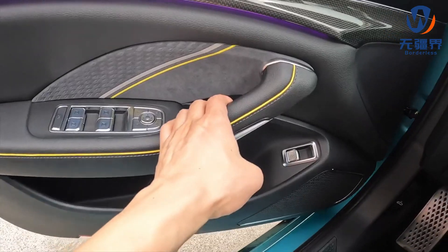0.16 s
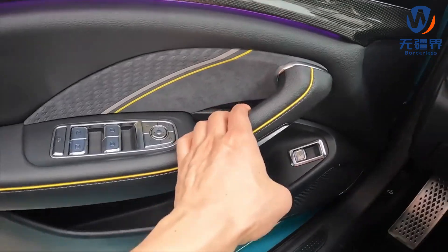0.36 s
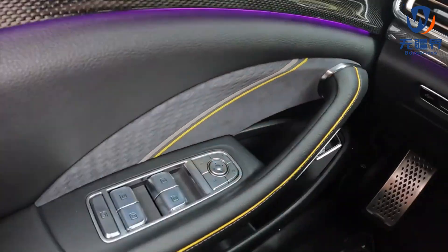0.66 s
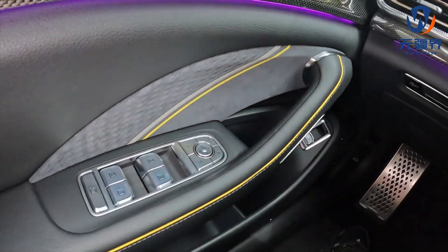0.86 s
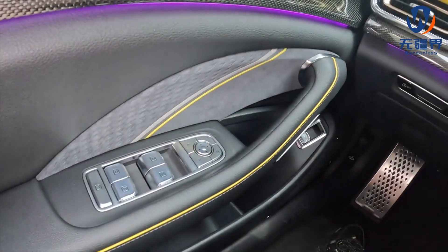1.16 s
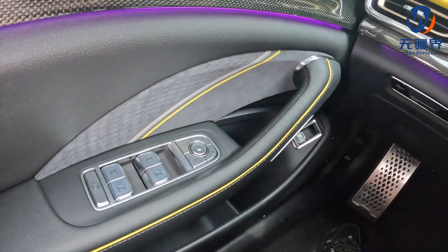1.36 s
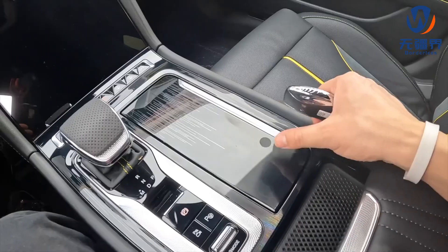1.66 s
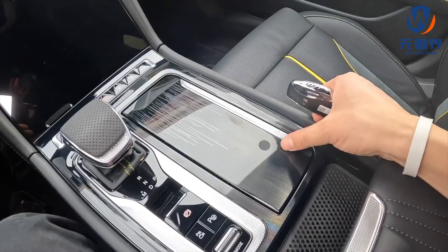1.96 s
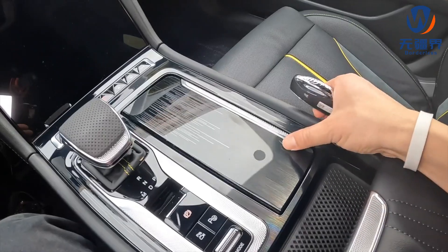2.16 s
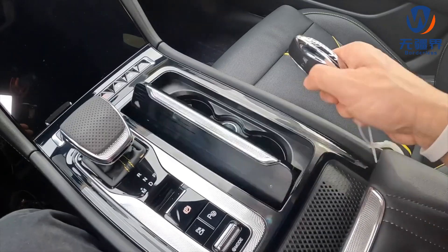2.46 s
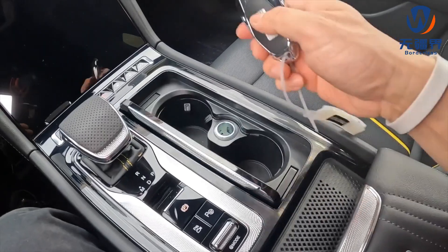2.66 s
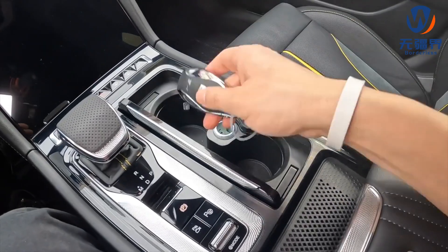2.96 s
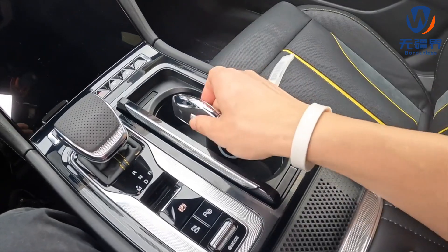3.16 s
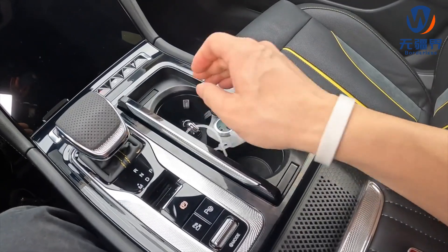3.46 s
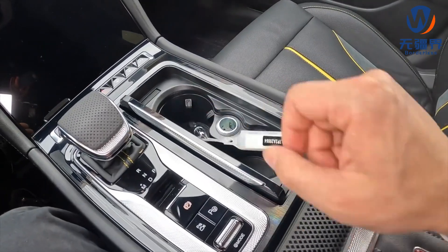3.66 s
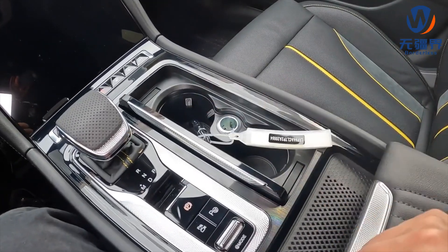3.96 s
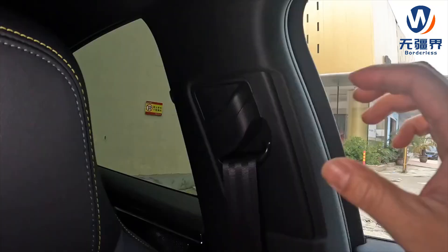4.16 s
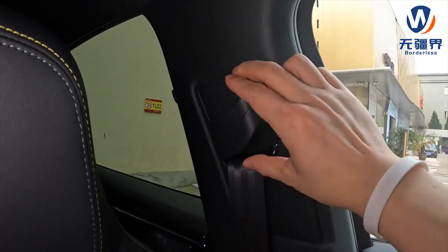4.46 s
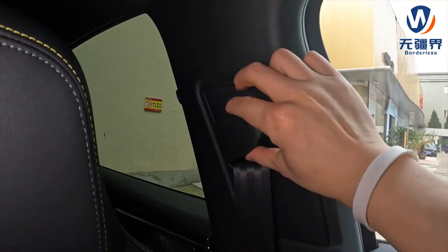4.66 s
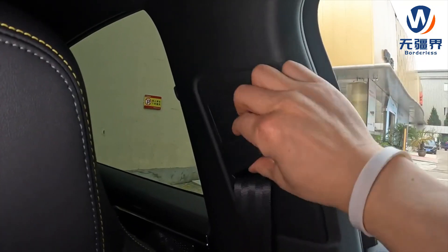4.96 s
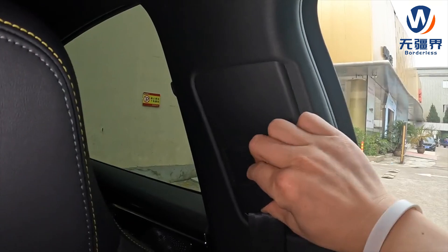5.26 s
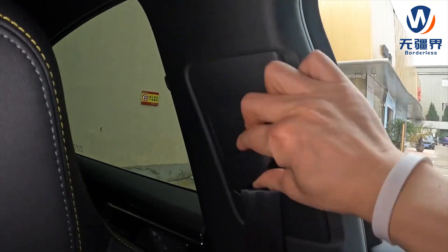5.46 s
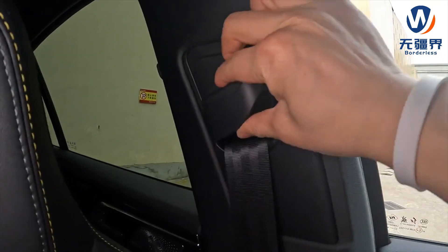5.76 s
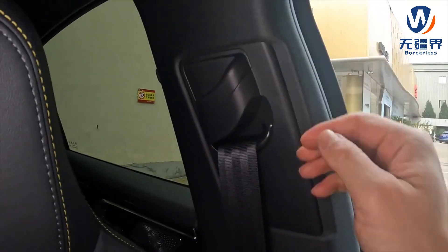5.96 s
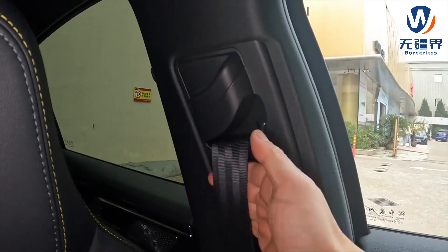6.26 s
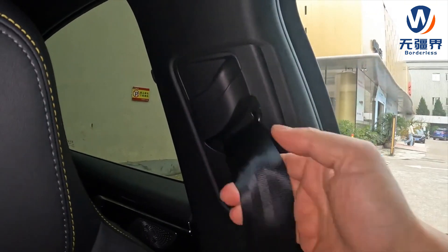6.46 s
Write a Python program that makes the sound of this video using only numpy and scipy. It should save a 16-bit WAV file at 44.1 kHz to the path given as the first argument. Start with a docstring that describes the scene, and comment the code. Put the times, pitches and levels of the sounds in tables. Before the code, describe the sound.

A parked car's dry, padded cabin, heard close from the seat with deep, uneven air rumble on the microphone. Faint street noise and light finger taps and rubbing open the scene. At about 0.65-0.7 s the door shuts: seal and latch thud, a hard punch and very deep boom, then quickly fading panel knocks until 0.9; the street is gone, leaving soft hiss, slightly louder from 1.5 to 4.1. A latch clicks at 2.0, the lid unhooks at 2.2 and stops softly at 2.6 over a low murmur. A fob tumbles hard in the cup holder at 3.3-3.4, rattles at 3.5, and its strap slaps at 3.7. After faint touches from 4.4, the belt adjuster scrapes down at 4.8, snaps at 5.0 and thuds at 5.1, slides up from 5.35 and clacks at 5.55. Taps, tiny squeaks near 5.95, then webbing hisses from 6.0, ending with a faint rising zip at 6.5.

```python
"""Street noise and deep rumble first, with light taps on trim, inside a parked car; then the door is pulled
shut and seals the street out. A console lid unlatches and flips open, a key fob drops in the cup holder, the
seat belt's height adjuster slides down and up into its stops, and the belt is drawn out.
Blows ring part modes and a short padded cabin; strokes are grainy noise; booms, webbing and squeaks are sines."""
import sys
import numpy as np
from scipy import signal
from scipy.fft import rfft, irfft, next_fast_len
from scipy.io import wavfile
from scipy.ndimage import uniform_filter1d

SR = 44100
rng = np.random.default_rng(int(sys.argv[2]) if len(sys.argv) > 2 else 0)


def master_out(mix):
    """Clip the mix to full scale and print it as 16-bit PCM to the path in sys.argv[1]."""
    frames = np.transpose(np.atleast_2d(mix))
    ceiling = np.clip(frames, -1, 1)
    pcm = np.round(ceiling * 32767).astype(np.int16)
    wavfile.write(sys.argv[1], SR, pcm)


N = 290619
TIME = np.arange(N) / SR  # s


def amp(db):
    """Decibels to gain."""
    return 10 ** (np.asarray(db) / 20)


def unit(x):
    """Scales to rms 1."""
    return x / np.sqrt(np.mean(x ** 2) + 1e-20)


def read(points, hz):
    """Reads a table along a log-frequency axis."""
    f, value = np.transpose(points)
    return np.interp(np.log(hz + 1), np.log(f + 1), value)


def swell(s, width_s, db):
    """A bell-shaped rise and fall of gain around time s."""
    return amp(db) * np.exp(-((TIME - s) / width_s) ** 2)


def add(mix, s, sound):
    """Mixes a sound in at time s."""
    part = mix[max(round(s * SR), 0):][:len(sound)]
    part += sound[:len(part)]


def noise(colour):
    """Steady noise of a given colour, rms 1."""
    size = next_fast_len(N, True)
    gain = amp(read(colour, np.fft.rfftfreq(size, 1 / SR)))
    spectrum = rfft(rng.standard_normal(size)) * gain
    return unit(irfft(spectrum, size)[:N])


def wobble(count, smooth):
    """Random drift of rms 1, smoothed over a number of samples."""
    return unit(uniform_filter1d(rng.standard_normal(count), size=smooth))


def tone(hz):
    """A sine that follows a varying pitch."""
    return np.sin(2 * np.pi * np.cumsum(hz) / SR)


def heave(depth_db, count=14):
    """A slow, uneven rise and fall of gain: sines from 0.8 to 6 Hz, the slower the stronger."""
    rates_hz, coarse = np.geomspace(.8, 6, count), TIME[::512]
    turns = np.outer(coarse, rates_hz) + rng.random(count)
    wave = np.sum(np.sin(2 * np.pi * turns) / np.sqrt(rates_hz), axis=1)
    return amp(depth_db * np.interp(TIME, coarse, unit(wave)))


# street colour: (frequency [Hz], relative density [dB per Hz])
STREET_COLOUR = [(53, -30.5), (90, -7), (114, -6), (222, -2.5), (483, -10), (1050, -9.5), (2950, -24),
                 (3430, -26.5), (9050, -32), (15500, -42.5)]
STREET_DB, SEALED_S, SEAL_DB_PER_S = -55.5, 0.852, 200


def street():
    """Steady street noise until the shut door seals it out."""
    return noise(STREET_COLOUR) * amp(STREET_DB - SEAL_DB_PER_S * np.maximum(TIME - SEALED_S, 0))


# hiss colour: (frequency [Hz], relative density [dB per Hz])
AIR_COLOUR = [(53, -29), (90, -7.5), (288, -17), (398, -14.5), (473, -18.5), (883, -20), (1330, -23),
              (3080, -26), (13900, -31), (15500, -28)]
AIR_DB, LOUDER_AIR_DB = -70.5, -62.5
LOUDER_FROM_S, LOUDER_TO_S = 1.545, 4.145


def air():
    """Faint steady hiss, at a higher level for a stretch."""
    louder = (TIME > LOUDER_FROM_S) & (TIME < LOUDER_TO_S)
    return noise(AIR_COLOUR) * amp(np.where(louder, LOUDER_AIR_DB, AIR_DB))


# rumble colour: (frequency [Hz], relative density [dB per Hz])
RUMBLE_COLOUR = [(4, 5), (8, 15.5), (17, 11), (24, -2.5), (31, -5.5), (40, -14.5), (55, -14), (72, -31),
                 (100, -36.5), (160, -46), (300, -72.5)]
# rumble surges: (time [s], 1/e half width [s], peak gain [dB])
SURGES = [(0.352, 0.22, -16.5), (5.55, 0.16, -19)]
RUMBLE_DB = -31  # before the heave


def rumble():
    """Deep rumble of air on the moving microphone, heaving slowly and surging as it is swung."""
    gain = amp(RUMBLE_DB) * heave(depth_db=1.8) + sum(swell(*row) for row in SURGES)
    return noise(RUMBLE_COLOUR) * gain


def causal(gain):
    """Minimum-phase response: a body rings only after it is struck."""
    log_gain = np.log(np.maximum(np.r_[gain, gain[-2:0:-1]], 1e-6))
    return np.exp(np.conj(signal.hilbert(log_gain)))[:len(gain)]


def ring(modes, hz, strengths):
    """Gain of a part: each mode lifts a narrow peak."""
    gain = 1
    for strength, (f, width_hz, lift_db) in zip(strengths, modes):
        gain = gain + strength * (amp(lift_db) - 1) / np.hypot(1, 2 * (hz - f) / width_hz) ** 1.64
    return gain


# cabin reverberation: (frequency [Hz], t60 [s])
CABIN = [(80, 0.27), (250, .11), (700, 0.088), (2500, 0.072), (6000, .07), (15000, 0.07)]


def cabin(size):
    """Dense reflections off glass and upholstery; the treble dies first."""
    hz, t, z = signal.stft(rng.standard_normal(size), SR, nperseg=256)
    fade = amp(-60 * t / read(CABIN, hz)[:, None])
    tail = signal.istft(z * fade, SR, nperseg=256)[1][:size]
    return unit(tail * (1 - np.exp(-np.arange(size) / SR / 0.0089)))


# colour of a contact on plastic: (frequency [Hz], gain [dB])
CONTACT = [(30, -11.5), (70, -6.5), (130, -1.5), (700, 3.5), (1500, -3), (3000, -9.5), (6000, -16),
           (7500, -19.5), (11000, -24.5), (16000, -31)]


def blows(rows, modes, t60_s, snap_db, rise_s, cabin_db, level_db, size=12288):
    """Each blow is a sharp contact and a brief rattle, rung through the part's modes and the cabin."""
    t, hz, out = np.arange(size) / SR, np.fft.rfftfreq(size, 1 / SR), np.zeros(N)
    edges_hz = [(110, 400), (400, 2500), (2500, 15000)]  # thud, knock, click
    bands = [(hz > lo) & (hz <= hi) for lo, hi in edges_hz]
    for s, *levels_db in rows:
        # each blow lands on another spot and favours other modes
        body = amp(read(CONTACT, hz)) * ring(modes, hz, rng.uniform(.6, 1.3, len(modes)))
        decay = np.exp(-np.log(1000) * t / t60_s)
        rattle = unit(rng.standard_normal(size) * decay * (1 - np.exp(-t / rise_s)))
        snap = amp(snap_db) * unit(1. * (t == 0))
        force = rfft(snap + rattle + amp(cabin_db) * cabin(size))
        # the hardness of the blow sets each band's rms over 10 ms
        energy = [2 * np.sum(abs(force * body)[band] ** 2) / size for band in bands]
        rms = np.sqrt(np.array(energy) / (SR / 100))
        thud, knock, click = np.array(levels_db) - 20 * np.log10(rms)
        hardness = amp(read([(300, thud), (480, knock), (2100, knock), (3100, click)], hz))
        add(out, s, irfft(force * causal(body * hardness)))
    return amp(level_db) * out


THUD_PER_BRIGHTNESS = 0.71  # dB of thud lost per dB of click over knock


def touches(rows, thud_db):
    """Light touches as blows: a nail or hard edge clicks, a fingertip thuds."""
    return [(s, db + thud_db - THUD_PER_BRIGHTNESS * bright, db, db + bright) for s, db, bright in rows]


def boom(s, hz, db, t60_s, rise_s, lag_turns):
    """A shove sets a low mode swinging as a decaying sine; any lag makes its pitch start lower."""
    t = np.arange(SR) / SR
    turns = hz * t - lag_turns * (1 - np.exp(-t / 0.048))
    envelope = np.exp(-np.log(1000) * t / t60_s) * (1 - np.exp(-t / rise_s))
    out = np.zeros(N)
    add(out, s, amp(db) * np.sin(2 * np.pi * turns) * envelope)
    return out


def wander(x, patchy_db):
    """As the contact moves, ever different narrow bands stand out."""
    z = signal.stft(x, nperseg=1024)[2]
    patches = uniform_filter1d(rng.standard_normal(z.shape), size=3, axis=0)
    patches = unit(uniform_filter1d(patches, size=7, axis=1))
    return signal.istft(z * amp(patchy_db * patches), nperseg=1024)[1][:N]


def band_part(x, band_hz):
    """One frequency band of a sound, scaled to rms 1."""
    return unit(signal.sosfilt(signal.butter(3, band_hz, "bandpass", fs=SR, output="sos"), x))


def slide(strokes, colour, grain_db, attack_s, release_s):
    """Friction: tiny slips make a grainy hiss that grows as a stroke gathers speed, holds, then dies."""
    out = np.zeros(N)
    slips = amp(grain_db * wobble(N, smooth=90))
    rub = wander(noise(colour), patchy_db=3.0) * slips
    body, hiss = band_part(rub, [170, 2000]), band_part(rub, [2000, 16000])
    for start, length, body_db, hiss_db in strokes:
        gather = np.clip((TIME - start) / min(attack_s, length), 0, 1)
        speed = gather * np.exp(-np.maximum(TIME - start - length, 0) / release_s)
        # the hiss needs more speed than the body
        out += speed * amp(body_db) * body + speed ** 1.3 * amp(hiss_db) * hiss
    return out


# changes of finger grip: (start [s], length [s], middle knock level [dB], click over knock [dB])
FIDGETS = [(0.343, .1, -48.5, -7.5), (4.413, .17, -56.5, -15)]


def fidgets(spread_db, count=3):
    """Each change of grip scatters a few touches of uneven strength."""
    rows = []
    for start, length, db, bright in FIDGETS:
        for k, (place, force) in enumerate(rng.random((count, 2))):
            rows.append((start + length * (k + place) / count, db + spread_db * (2 * force - 1), bright))
    return rows


# fingers and belt guide on the trim: (time [s], knock before level_db [dB], click over knock [dB])
TRIM_TAPS = [(.307, -47.5, -3), (.457, -43, -6.5), (3.04, -52, -8), (4.374, -56, -22.5), (4.699, -40.5, -5),
             (4.746, -37.5, -5), (4.868, -44, -19), (4.884, -37, -24), (5.283, -48.5, -31),
             (5.639, -41, -4), (5.657, -42.5, -4.5), (5.766, -46, -12), (5.802, -30, -18),
             (5.812, -28.5, -15.5), (6.032, -36, -14.5), (6.091, -43, -2.5), (6.274, -35.5, -19),
             (6.374, -37.5, -17)]
# trim panel modes: (frequency [Hz], width [Hz], nominal lift [dB])
TRIM_MODES = [(112, 17, 7), (392, 44, 8.6), (540, 57, 11), (679, 130, 6), (810, 84, 8.7), (1080, 79, 4.7),
              (1630, 140, 4.5), (2620, 160, 6.7), (4600, 360, 3.7), (8540, 400, 9.9)]


def trim_taps():
    """Light touches ring the plastic trim."""
    taps = touches(TRIM_TAPS + fidgets(spread_db=3.5), thud_db=-10.5)
    return blows(taps, TRIM_MODES, t60_s=.028, snap_db=-3, rise_s=.0008, cabin_db=-5.0, level_db=-2.5)


# squeaks as the fingers let go: (time [s], mean pitch [Hz], peak level [dB], length [s])
SQUEAKS = [(5.938, 1080, -58, 0.019), (5.963, 1000, -58, 0.033)]


def squeaks(waver):
    """Skin sticks and slips on plastic: short unsteady tones."""
    out = np.zeros(N)
    for s, hz, db, length in SQUEAKS:
        n = round(length * SR)
        pitch = hz * (1 + waver * wobble(n, smooth=40))
        add(out, s, amp(db) * np.hanning(n) * tone(pitch))
    return out


# sleeve, hand and strap brush the trim: (start [s], length [s], body [dB], hiss [dB])
SLEEVE = [(.29, .2, -54, -71), (.6, 0.051, -53.5, -56.5), (2.27, 0.516, -58, -67),
          (2.865, 0.052, -55.5, -53), (3.22, 0.087, -75.5, -60.5), (3.47, 0.058, -39.5, -47),
          (4.4, 0.19, -54.5, -70.5)]
# sleeve colour: (frequency [Hz], relative density [dB per Hz])
SLEEVE_COLOUR = [(150, -1), (420, 1), (800, -4), (1500, -21), (2500, -14), (6000, -16.5), (10000, -20.5),
                 (15500, -30)]
# hand slips off the armrest: (start [s], length [s], body [dB], hiss [dB])
HAND_SLIP = [(.47, 0.11, -66.5, -56)]
# slip colour: (frequency [Hz], relative density [dB per Hz])
SLIP_COLOUR = [(150, -7), (3000, -4), (7000, -1.5), (13000, -3), (15500, -5)]


def brushes():
    """Cloth and skin rub on trim; the slipping hand makes an airy swish."""
    out = slide(SLEEVE, SLEEVE_COLOUR, grain_db=3, attack_s=0.024, release_s=0.027)
    return out + slide(HAND_SLIP, SLIP_COLOUR, grain_db=0.0, attack_s=0.04, release_s=.01)


# blow levels below are before level_db
# push latch pressed and let go: (time [s], thud [dB], knock [dB], click [dB])
LID_LATCH = [(1.926, -54.5, -48.5, -62), (1.997, -50, -42.5, -47), (2.005, -42.5, -36, -27),
             (2.191, -55, -50.5, -52.5)]
# latch modes: (frequency [Hz], width [Hz], nominal lift [dB])
LATCH_MODES = [(93.4, 16, 31), (445, 21, 19.7), (880, 20, 5.5), (2750, 100, 3.5), (4630, 170, 15),
               (5850, 800, 14), (13200, 12000, 6.6)]
# sprung lid unhooks and swings open: (time [s], thud [dB], knock [dB], click [dB])
LID_STOP = [(2.226, -48, -37.5, -38), (2.234, -41, -30, -37), (2.334, -50, -55, -89),
            (2.635, -41, -40, -60)]
# lid modes: (frequency [Hz], width [Hz], nominal lift [dB])
LID_MODES = [(106, 17, 20), (313, 43, 12), (768, 110, 16), (1510, 44, 7.1), (2170, 150, 13.7),
             (5870, 540, 5.5)]
# low murmur colour: (frequency [Hz], relative density [dB per Hz])
MURMUR_COLOUR = [(50, -29.5), (85, -2.5), (110, 1.5), (140, -15), (190, -15.5), (400, -23), (1000, -46.5),
                 (4000, -81.5)]


def console_lid():
    """The latch clicks and the lid swings open over a low murmur that swells and fades."""
    out = blows(LID_LATCH, LATCH_MODES, t60_s=0.042, snap_db=-18, rise_s=0.0018, cabin_db=-17, level_db=-0.5)
    out += blows(LID_STOP, LID_MODES, t60_s=0.038, snap_db=-6, rise_s=0.0004, cabin_db=-7.5, level_db=-0.5)
    return out + noise(MURMUR_COLOUR) * swell(s=2.45, width_s=0.51, db=-57)


# fob tumbles in the cup holder: (time [s], thud [dB], knock [dB], click [dB])
FOB_DROP = [(3.3235, -48, -19, -21), (3.3372, -42, -11.5, -17), (3.35, -29.5, -22.5, -29),
            (3.3644, -20, -10, -23), (3.3775, -27.5, -26.5, -24.5), (3.4005, -27.5, -19.5, -34.5),
            (3.412, -32.5, -32, -33)]
# fob modes: (frequency [Hz], width [Hz], nominal lift [dB])
FOB_MODES = [(342, 82, 6.9), (610, 80, 2), (706.6, 100, 10), (844, 53, 5), (1692, 88, 9), (1983, 78, 11),
             (2508, 87, 13), (2870, 100, 11), (3650, 100, 5.4), (5440, 1100, 6)]
# fob slips down and rattles against its ring: (time [s], knock [dB], click over knock [dB])
FOB_SETTLE = [(3.468, -35, -9.5), (3.484, -24.5, -12), (3.506, -31.5, -4.5), (3.5235, -25, -6.5),
              (3.536, -32.5, -9.5), (3.601, -47, 1)]
# settling fob modes: (frequency [Hz], width [Hz], nominal lift [dB])
SETTLE_MODES = [(794, 82, 10.3), (950, 110, 9.4), (1650, 110, 16.4), (1950, 110, 12.3), (2590, 630, 4.4),
                (5350, 780, 2.9)]
# fob's strap falls on the console: (time [s], thud [dB], knock [dB], click [dB])
STRAP_DROP = [(3.6845, -60, -30, -42.5), (3.6923, -41, -24.5, -36.5), (3.733, -41, -43.5, -58.5)]
# strap modes: (frequency [Hz], width [Hz], nominal lift [dB])
STRAP_MODES = [(545, 23, 9.8), (870, 120, 12.9), (1530, 46, 9.3), (1660, 100, 8.6), (5060, 1700, 8.1)]


def key_fob():
    """The fob tumbles, settles with a rattle, and its strap falls after it."""
    out = blows(FOB_DROP, FOB_MODES, t60_s=.03, snap_db=-4.5, rise_s=0.00033, cabin_db=-10, level_db=0.0)
    settle = touches(FOB_SETTLE, thud_db=-26)
    out += blows(settle, SETTLE_MODES, t60_s=0.031, snap_db=-2.0, rise_s=0.00014, cabin_db=-2.5, level_db=2.0)
    return out + blows(STRAP_DROP, STRAP_MODES, t60_s=0.036, snap_db=0.0, rise_s=0.00099,
                       cabin_db=-6, level_db=5.5)


# hand runs down the belt, then draws it out: (start [s], length [s], body [dB], hiss [dB])
WEBBING = [(6.025, 0.257, -55.5, -63), (6.38, .22, -58, -57.5)]
# webbing colour: (frequency [Hz], relative density [dB per Hz])
WEBBING_COLOUR = [(150, -6), (350, -11), (480, -8), (780, -14), (1000, -16.5), (2100, -11), (3800, 1),
                  (5000, 1), (6300, 0), (9000, -3), (15500, -11)]
WEAVE_S, WEAVE_HZ, WEAVE_RISE_HZ_PER_S = 6.54, 694, 2600  # loudest moment, mean pitch there, glide


def weave(waver, width_s, db):
    """The ribs of the webbing tick over the guide fast enough to make a faint rising tone."""
    hz = np.maximum(WEAVE_HZ + WEAVE_RISE_HZ_PER_S * (TIME - WEAVE_S), 0)
    pitch = hz * (1 + waver * wobble(N, smooth=150))
    return swell(WEAVE_S, width_s, db) * tone(pitch)


def belt_webbing():
    """Webbing hisses under the hand and sings over its guide."""
    out = slide(WEBBING, WEBBING_COLOUR, grain_db=1.0, attack_s=.06, release_s=.025)
    return out + weave(waver=.028, width_s=0.053, db=-54)


# adjuster slides on its rail: (start [s], length [s], body [dB], hiss [dB])
RAIL = [(4.835, .2, -38.5, -40.5), (5.36, .193, -41.5, -42), (5.59, .075, -44, -54), (5.74, .077, -41, -48)]
# rail colour: (frequency [Hz], relative density [dB per Hz])
RAIL_COLOUR = [(150, 0.5), (300, -5), (550, -0.5), (850, -8), (1350, -9), (1900, -16.5), (3000, -16.5),
               (5500, -21.5), (9000, -25.5), (15500, -31)]
# pin drops in the low notch: (time [s], thud [dB], knock [dB], click [dB])
PIN_SNAP = [(5.035, -20.5, -9.5, -11), (5.0395, -11, -23, -23), (5.052, -25.5, -28.5, -28.5)]
# slider sinks on to the pin: (time [s], thud [dB], knock [dB], click [dB])
PIN_SEAT = [(5.1117, -23, -27, -43)]
# pin modes: (frequency [Hz], width [Hz], nominal lift [dB])
PIN_MODES = [(160.7, 49.5, 5.5), (245, 56, 12.3), (549, 69, 10.3), (1048, 190, 1.7), (1320, 200, 9.7),
             (2975, 170, 13), (3924, 160, 14.7), (5000, 550, 9.4), (5870, 280, 18.2), (8600, 350, 10)]
# adjuster hits the top of its rail: (time [s], thud [dB], knock [dB], click [dB])
TOP_STOP = [(5.553, -9.5, -5.5, -21.5), (5.575, -17, -21.5, -37.5)]
# top stop modes: (frequency [Hz], width [Hz], nominal lift [dB])
STOP_MODES = [(120, 7.7, 2), (250, 45, 7.4), (380, 50, 6.5), (573, 140, 17), (690, 130, 9.8),
              (1080, 270, 7), (1380, 420, 8.9), (2700, 150, 6), (6300, 500, 4)]


def height_adjuster():
    """The adjuster gathers speed down to a notch and up to its stop, and its pin snaps in."""
    out = slide(RAIL, RAIL_COLOUR, grain_db=1.2, attack_s=0.37, release_s=.009)
    out += blows(PIN_SNAP, PIN_MODES, t60_s=0.033, snap_db=-7.0, rise_s=0.001, cabin_db=-15.5, level_db=-1.5)
    out += blows(PIN_SEAT, PIN_MODES, t60_s=0.026, snap_db=-5, rise_s=.0004, cabin_db=-12, level_db=-1.5)
    # the pillar's cover hums on
    out += boom(s=5.113, hz=140, db=-20.5, t60_s=0.11, rise_s=0.0023, lag_turns=0)
    return out + blows(TOP_STOP, STOP_MODES, t60_s=.027, snap_db=0.5, rise_s=0.00066,
                       cabin_db=-13.5, level_db=0.5)


# first knock and loss per knock: (thud [dB], knock [dB], click [dB])
SHUDDER_DB, SHUDDER_LOSS_DB = (-14, -24.5, -53), (10, 10.5, 4)
SHUDDER_START_S, SHUDDER_GAP_S = .736, .032


def shudder(count=5):
    """The inner panel knocks once per swing of the door, each knock weaker than the last."""
    rows = []
    for k in range(count):
        levels_db = np.array(SHUDDER_DB) - k * np.array(SHUDDER_LOSS_DB)
        rows.append((SHUDDER_START_S + k * SHUDDER_GAP_S, *levels_db))
    return rows


# seal touches, squeezes and rebounds: (time [s], thud [dB], knock [dB], click [dB])
DOOR_SEAL = [(.652, -36, -37, -49), (.662, -29, -30.5, -43), (.681, -24.5, -33, -33.5),
             (.707, -30.5, -28, -37)]
# latch catches: (time [s], thud [dB], knock [dB], click [dB])
DOOR_LATCH = [(.677, -12, -15.5, -25)]
# door modes: (frequency [Hz], width [Hz], nominal lift [dB])
DOOR_MODES = [(74, 60, 13.5), (177, 15, 0), (366, 25, 7.5), (726, 120, 4), (1095, 86, 7), (1830, 1400, 9.5),
              (2790, 390, 8)]
# inner panel modes: (frequency [Hz], width [Hz], nominal lift [dB])
PANEL_MODES = [(358, 65, 7.7), (432, 114, 24.6), (780, 73, 16), (1260, 170, 9.8), (1510, 100, 9.4)]


def door():
    """Seal and latch strike, the cabin's air booms and the inner panel shakes."""
    out = blows(DOOR_SEAL, DOOR_MODES, t60_s=0.092, snap_db=-22, rise_s=0.0016, cabin_db=-2.5, level_db=1.5)
    out += blows(DOOR_LATCH, DOOR_MODES, t60_s=0.023, snap_db=-23.5, rise_s=.0031, cabin_db=-9, level_db=1)
    out += blows(shudder(), PANEL_MODES, t60_s=0.049, snap_db=-11, rise_s=.0038, cabin_db=-13.5, level_db=-.5)
    out += boom(s=.682, hz=33.3, db=1, t60_s=.36, rise_s=.002, lag_turns=.24)
    out += boom(s=.68, hz=71.4, db=-11.5, t60_s=0.34, rise_s=0.0037, lag_turns=0)
    # the door's skin gives one hard punch
    return out + boom(s=.6778, hz=185, db=4, t60_s=.024, rise_s=.0008, lag_turns=0)


def scene():
    """Background, hands, console, belt and door, heard from the seat."""
    background = street() + air() + rumble()
    hands = trim_taps() + squeaks(waver=0.085) + brushes()
    console = console_lid() + key_fob()
    belt = belt_webbing() + height_adjuster()
    return (background + hands + console + belt + door())[None]


EDGE_HZ = 15560


def record(dry):
    """The loudest peaks are rounded off just under full scale; then the band limit."""
    rounded = dry / (1 + (dry / .94) ** 6) ** (1 / 6)
    lowpass = signal.firwin(401, EDGE_HZ, window=("kaiser", 9), fs=SR)
    return signal.oaconvolve(rounded, lowpass[None], "same")


dry = scene()
out = record(dry)
master_out(out)
```